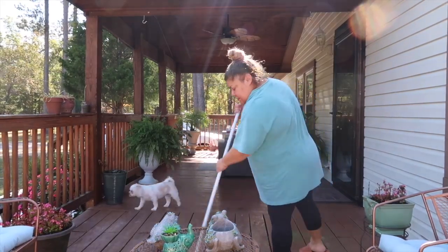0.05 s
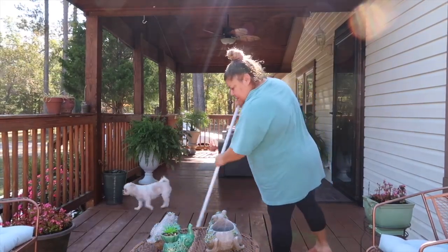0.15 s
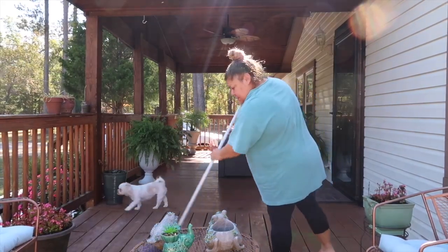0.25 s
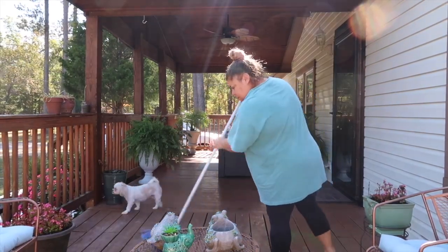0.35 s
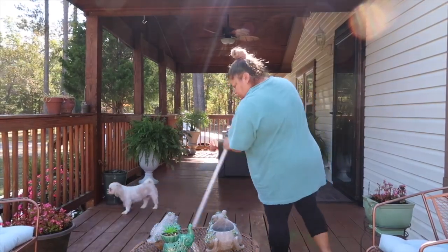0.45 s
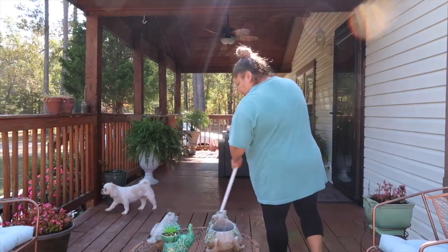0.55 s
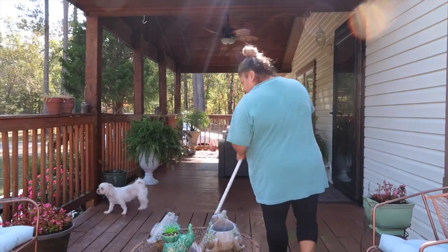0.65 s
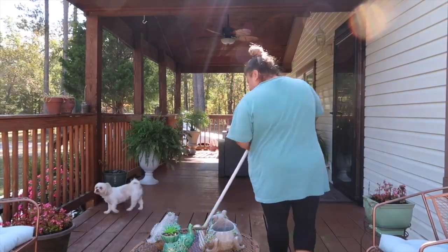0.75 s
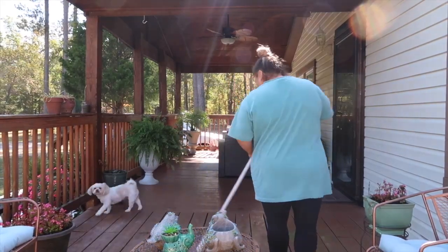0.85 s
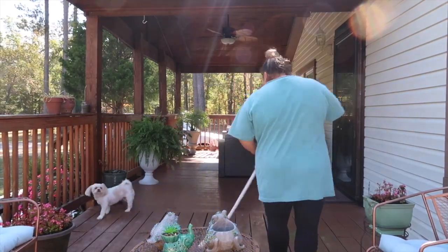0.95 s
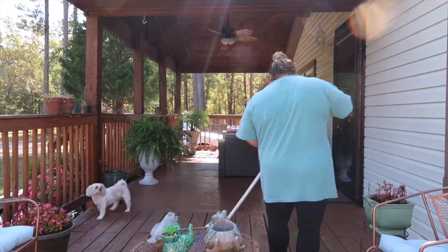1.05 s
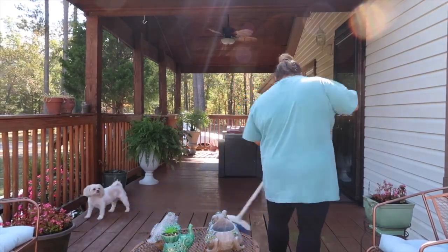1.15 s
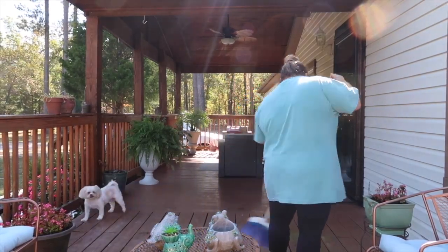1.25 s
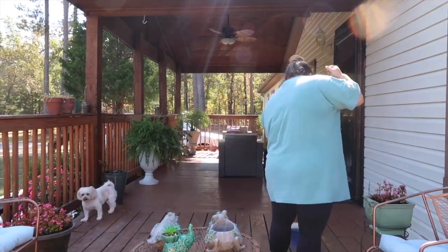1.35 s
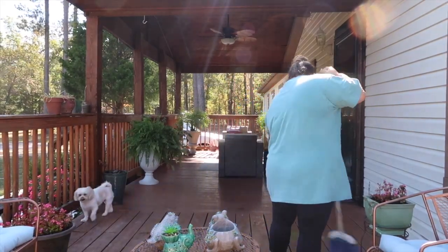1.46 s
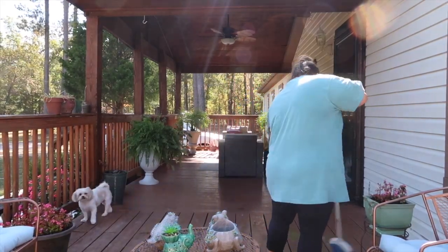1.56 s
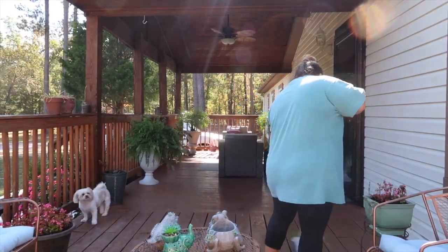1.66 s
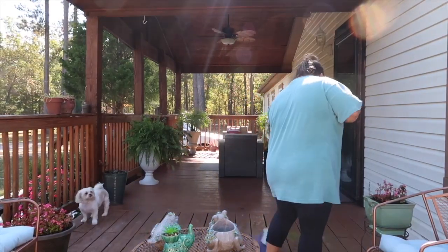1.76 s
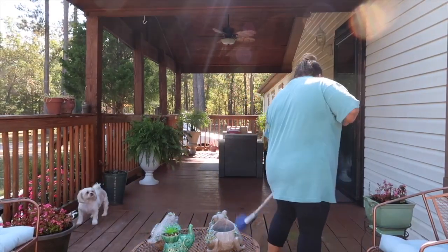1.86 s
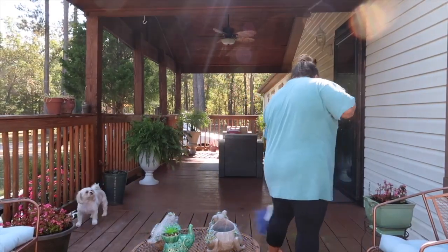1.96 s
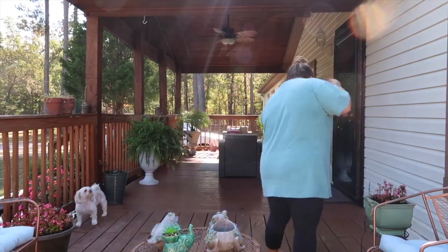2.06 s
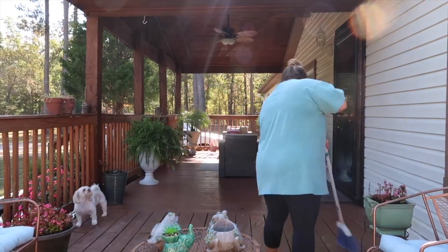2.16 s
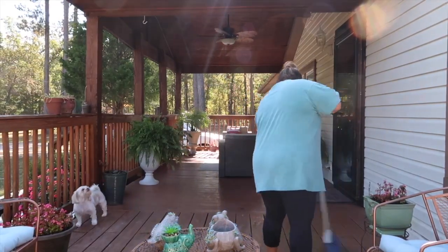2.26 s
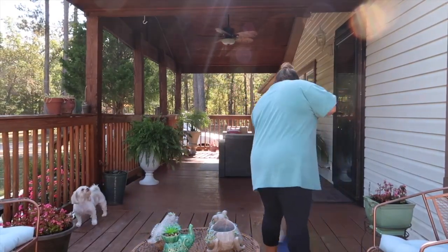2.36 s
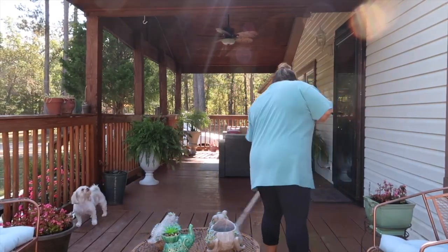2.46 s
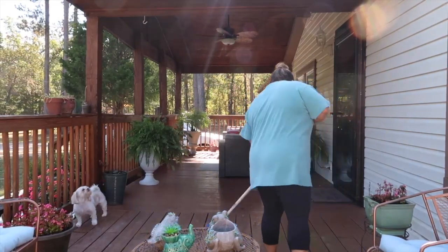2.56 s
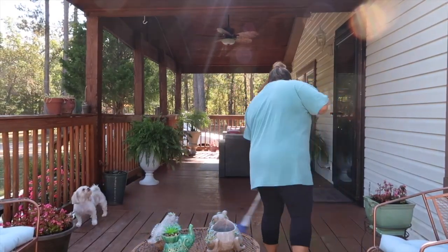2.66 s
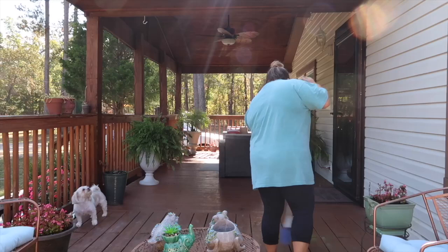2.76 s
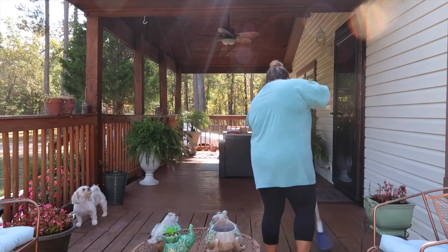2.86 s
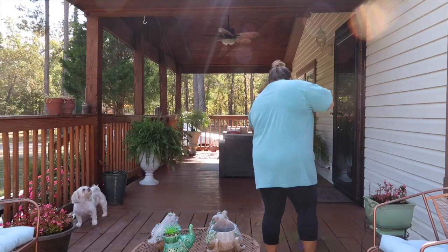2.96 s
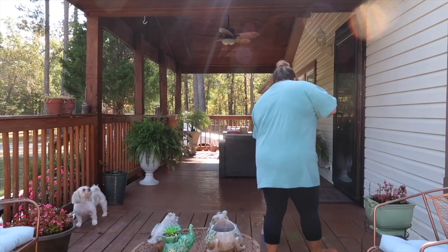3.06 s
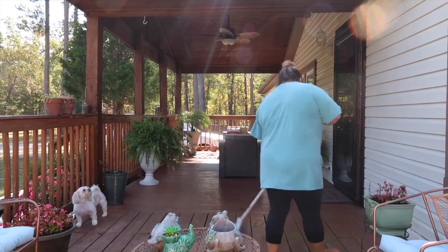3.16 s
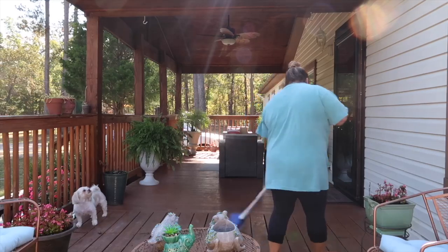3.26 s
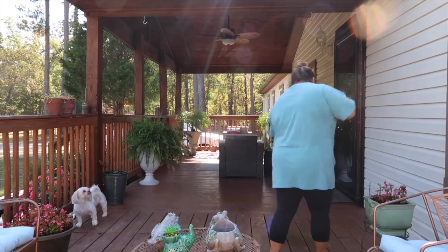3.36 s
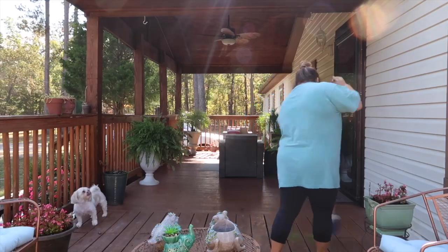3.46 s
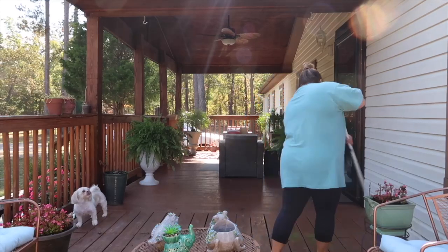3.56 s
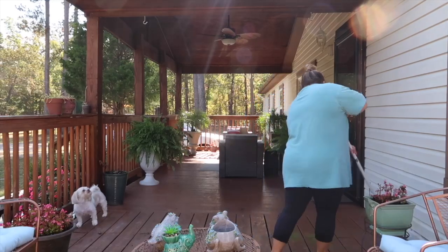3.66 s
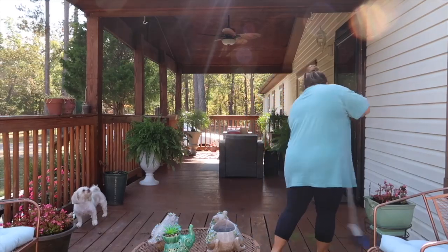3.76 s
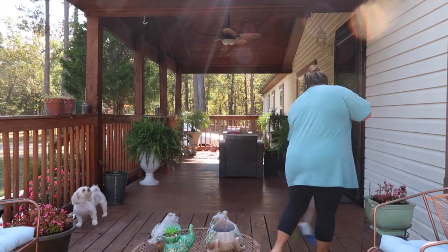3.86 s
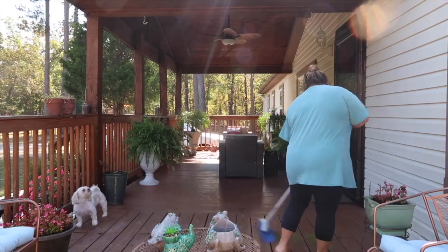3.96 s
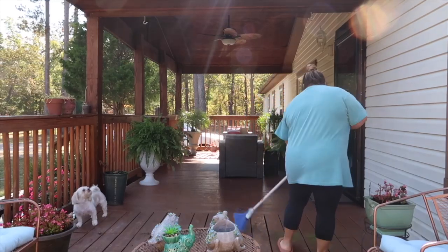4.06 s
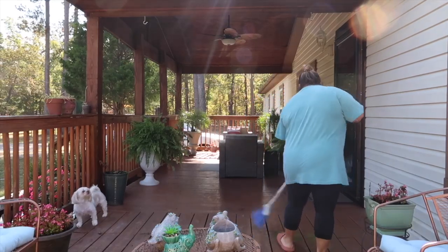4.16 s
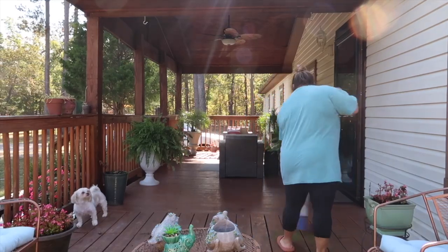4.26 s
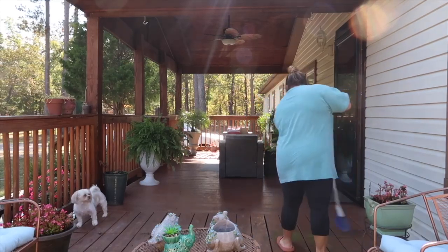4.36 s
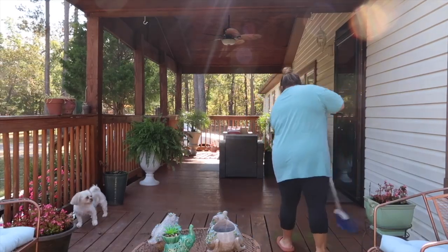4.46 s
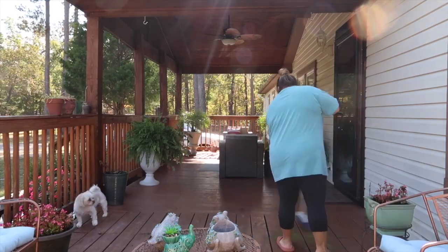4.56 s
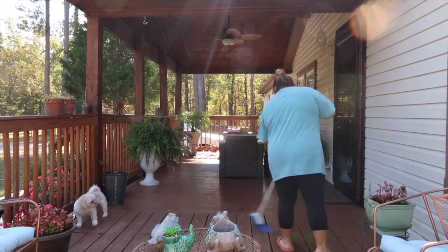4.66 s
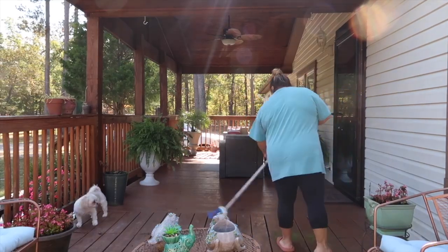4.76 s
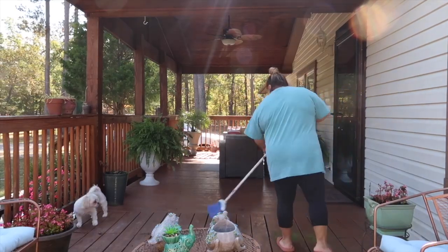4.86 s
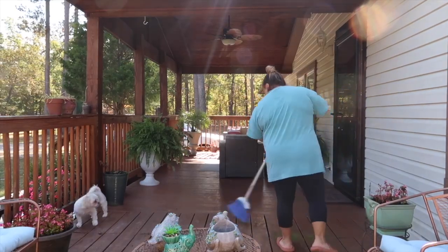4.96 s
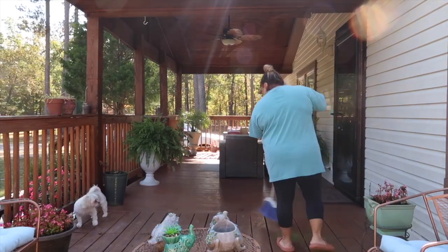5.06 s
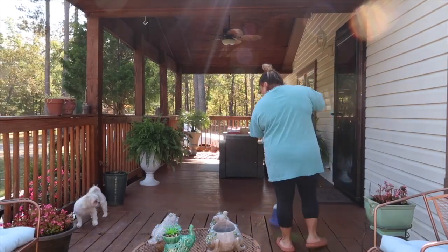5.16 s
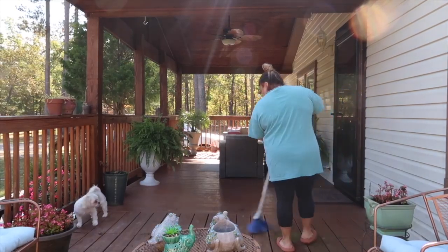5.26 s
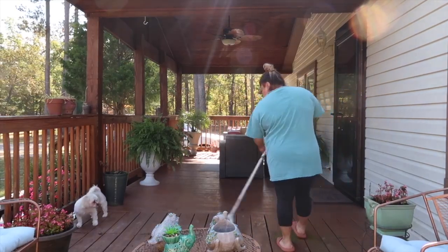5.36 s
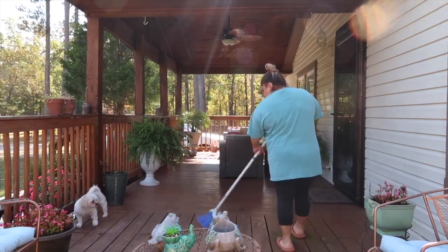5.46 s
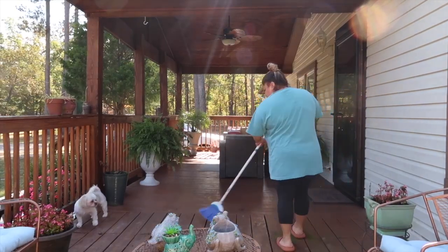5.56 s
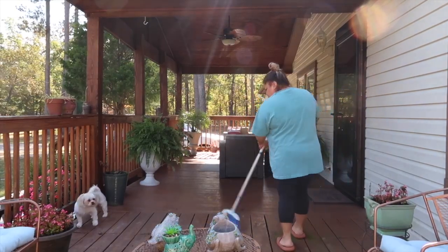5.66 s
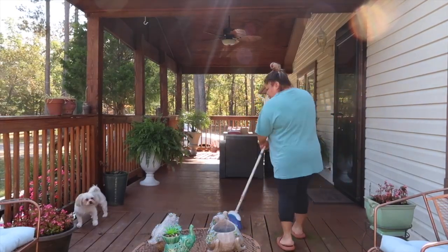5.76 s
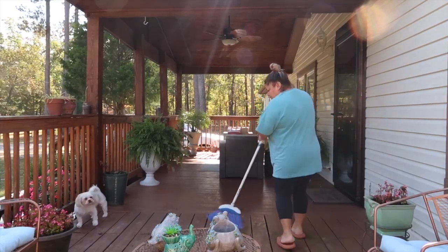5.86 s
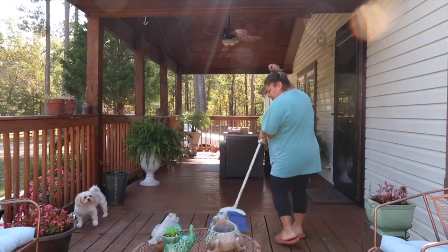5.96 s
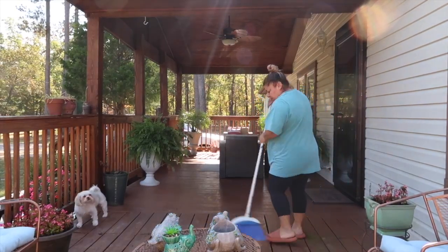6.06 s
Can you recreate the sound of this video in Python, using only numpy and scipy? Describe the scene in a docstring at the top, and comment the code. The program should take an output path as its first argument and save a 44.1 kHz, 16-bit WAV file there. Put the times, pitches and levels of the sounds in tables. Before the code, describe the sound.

A stiff plastic broom sweeps a wooden porch deck in steady swishing strokes, with one loud hard knock early on and small ticks and scratches.

```python
"""A broom on a wooden deck

A plastic broom sweeps a wooden deck under a porch roof, heard a few metres away through two close ports.
Bristles flicking over the grain are random clicks and noise shaped by spectra and board resonances.
The head lands with taps and one hard knock, made of ringing modes, noise splashes and a deck thud.
The handle ticks and creaks in its socket, tufts scratch as they snag, and soft thumps bend the boards.
Roof and wall give a short echo of fading noise, over a quiet outdoor background of shaped noise.
"""
import sys
import numpy as np
from scipy import signal
from scipy.fft import rfft, irfft, next_fast_len
from scipy.io import wavfile
from scipy.ndimage import map_coordinates

SR = 44100
rng = np.random.default_rng(int(sys.argv[2]) if len(sys.argv) > 2 else 0)


def wrap_up_sound(samples):
    """Save the sound to the file named by the first command line argument, as 16-bit audio."""
    columns = np.atleast_2d(samples).T
    # keep every value between -1 and 1, then stretch to whole-number steps
    tamed = np.clip(columns, -1, 1)
    steps = np.round(tamed * 32767).astype(np.int16)
    wavfile.write(sys.argv[1], SR, steps)


N = 268811  # length of the scene in samples

# Broom strokes; start_s is when full speed is reached, levels are before the trims in sweeping():
# start_s, hold_s, rise_s, fall_s, bristle_db, rasp_db, tip_hiss_db, rumble_db, tip_lag_s
STROKES = [ (0.223, 0.055, 0.19, 0.2, -33.5, -45.5, -50, -67, 0.048),
           (0.621, 0.019, 0.073, 0.078, -41, -45.5, -48, -42, 0.031),
           (0.769, 0.017, 0.11, 0.43, -45, -50, -82, -70, 0.026),
           (0.946, 0.007, 0.026, 0.045, -71, -45, -56, -62, 0.019),
           (1.222, 0.021, 0.16, 0.29, -48, -54.5, -59, -58, -0.018),
           (1.464, 0.029, 0.74, 0.087, -52, -70, -71, -69, -0.0051),
           (1.74, 0.099, 0.37, 0.13, -40.5, -44, -55, -40, 0.011),
           (2.084, 0.065, 0.19, 0.3, -49.5, -56, -87, -74, 0.045),
           (2.434, 0.11, 0.24, 0.21, -41, -38.5, -49, -41, 0.025),
           (3.096, 0.16, 0.16, 0.22, -42, -41.5, -52.5, -43.5, 0.000089),
           (3.416, 0.033, 0.25, 0.2, -55.5, -78, -61.5, -69, 0.0082),
           (3.858, 0.26, 0.16, 0.14, -42, -41.5, -53, -42, -0.00031),
           (3.945, 0.041, 0.077, 0.096, -53.5, -35, -68, -25, 0),
           (4.684, 0.16, 0.21, 0.18, -40.5, -39, -50.5, -38, -0.0045),
           (5.37, 0.049, 0.14, 0.23, -37.5, -34.5, -50, -38, 0.036),
           (5.962, 0.018, 0.075, 0.14, -63.5, -57, -94, -47, 0)]
# Light brushing between strokes, same trims: bristle_db, rasp_db, tip_hiss_db, rumble_db
TRAIL_DB = (-70, -63.5, -68.5, -56)
SWING_DB = 24.5  # a stroke gains this much over its rise and loses it over its fall
SWING_CURVE = 1.274  # power that bends the level over at the top and makes it drop ever faster

# Board resonances under the rubbing bristles, before they drift: pitch_hz, width_hz, level_db
RASP = [(419, 87, 0.5), (589, 33, 6), (705, 90, 5.5), (910, 250, 4), (995, 185, 8), (1210, 113, -4),
        (1417, 49, 2.5)]
# Deep shaking of the boards: pitch_hz, width_hz, level_db
RUMBLE = [(80, 31, -2.5), (136.6, 21, 1.5), (169, 12, 4), (226, 55, -6), (289, 9.3, -4.5)]
BOARD_DRIFT = .07  # typical drift of the rasp's pitch from spot to spot, as a share of it
# Spectrum of the bristles: pitch_hz, level_db
BRISTLES = [(200, -7), (700, -9), (1200, -9), (1800, -1), (2300, -1), (2700, -3.5), (3200, -2), (4000, -9),
            (5000, -16), (7000, -16), (12000, -36)]
# Spectrum of the fine tips: pitch_hz, level_db
TIPS = [(2500, -25), (4200, -6), (4800, -1), (6800, -1), (8200, -.5), (9300, 0), (11000, 1), (12800, -1),
        (14000, -9), (15500, -20)]
# Spectrum of the tip fizz that differs between the ports: pitch_hz, level_db
SCATTER = [(3000, -1), (4600, 5.5), (7200, -3), (8200, 1), (9300, -47)]

# Stiff tufts snag and scratch free; the rows near 5.73 s are instead sharp cracks of the head landing: start_s,
# level_db, pitch_hz (centre), length_s
SNAGS = [(0.211, -43, 2240, .014), (.24, -35, 2200, .01), (0.525, -54.5, 2240, .012),
         (0.565, -44, 3070, 0.014), (0.6, -43, 1060, .012), (0.632, -55, 990, .012),
         (0.739, -47, 1920, 0.022), (0.959, -52, 3000, .02), (1.832, -47, 2600, .03),
         (2.277, -36, 2490, .008), (2.288, -45, 900, .018), (2.468, -39, 1480, .016),
         (2.51, -42, 1900, .01), (2.551, -40.5, 2020, .026), (2.57, -39.5, 4030, .008),
         (2.971, -44.5, 1660, .018), (3.148, -52, 2200, .016), (3.197, -48, 2390, .014),
         (3.216, -43, 2100, .018), (3.758, -44, 1650, .016), (3.86, -39.5, 2150, .018),
         (3.907, -36, 890, .014), (4.147, -40.5, 2100, .008), (4.626, -57, 1900, .014),
         (4.674, -44, 2000, .016), (4.784, -47, 1300, .014), (4.899, -51, 2380, .026),
         (4.969, -52.5, 2440, 0.011), (5.112, -53.5, 2610, .008), (5.258, -51, 2400, 0.015),
         (5.357, -41, 1900, .012), (5.378, -37.5, 1190, .016), (5.73, -30, 3370, 0.0032),
         (5.738, -31, 1300, .004), (5.745, -37, 3000, .004), (5.962, -55, 2700, .024)]
# Lesser snags: how many a second, level against the rasp level and its spread (dB)
SNAG_PER_S, SNAG_DB, SNAG_SPREAD_DB = 45, -2.5, 2.2
SNAG_LOW_HZ, SNAG_HIGH_HZ = 850, 4200
SNAG_SHORT_S, SNAG_LONG_S = .003, .012

# The head meets wood, ring level before dulling and splash level before fading:
# start_s, ring_db, thud_db, splash_db, pitch_factor (no unit), cushion_s (softening by the bristles)
BLOWS = [(0.568, -27, -61, -38.5, 1.5, 0.0011), (.587, -19, -52, -54, 0.91, 0.0013),
         (0.932, -19, -64, -52, 2.3, 0.00092), (1.5642, 10.5, -13, -20.5, 1.0, .0004),
         (1.572, -12, -48, -28, 1.1, .001), (1.5879, -7, -29, -41, 1.4, 0.00047),
         (1.5935, -10, -27, -36, 1.4, 0.0018), (1.613, -11, -35, -48, 1.6, .001),
         (2.279, -6.5, -36, -40, 1.2, 0.0028), (2.975, -9, -41.5, -42.5, 1.08, 0.0071),
         (3.147, -16.5, -40.5, -38, 1.2, .002), (3.2, -16, -52, -38, 0.93, 0.0025),
         (3.758, -12, -39.5, -48, 0.94, 0.011), (3.896, -10.5, -45, -34.5, 0.62, 0.0058),
         (4.049, -13, -36, -41, 0.96, 0.0012), (4.607, -18.5, -55, -51, 0.7, 0.0023),
         (5.11, -34, -63, -50, 0.87, .001), (5.255, -4.5, -42, -30, 1.18, 0.0073),
         (5.7265, -8.5, -40, -30, 0.91, 0.0045), (5.737, -16, -41, -38, 1.17, 0.0008),
         (5.7504, -16, -62, -32, 2.4, 0.00054), (5.883, -17.5, -71, -41, 1.06, 0.0031)]
# Ringing of the head at pitch factor 1: pitch_hz, level_db, t60_s (time to fade by 60 dB)
HEAD = [(490, -5.5, 0.039), (683, -10, 0.18), (837, -3.5, 0.11), (939, 10, 0.033), (1020, -21, 0.51),
        (1175, -8, 0.097), (1316, -14, 0.23), (1373, -4.5, 0.049), (1482, 10, 0.02), (1620, -2.5, 0.056),
        (1810, -15.5, 0.18), (1970, -1.5, 0.032), (2176, 11, 0.01), (2440, -10, 0.056), (2820, -17, 0.14),
        (3390, -4, 0.022), (3750, -12, 0.019), (4590, 2.5, 0.0067)]
# Ringing of the deck: pitch_hz, level_db, t60_s
DECK = [(116.8, 6, 0.15), (147.9, 3, 0.29), (166, -10, 0.18), (212, -5.5, 0.17), (251, 3, 0.11),
        (286.4, -2.5, 0.19), (314, -2.5, 0.18), (396.2, -10, 0.28), (466, -15, 0.26), (569, -19, 0.51),
        (659, -17.5, 0.3)]
# Spectrum of the bristle splash: pitch_hz, level_db
SPLASH = [(40, -42), (130, 5.5), (300, -1.5), (600, 3), (1000, -4.5), (1700, -3.5), (3000, 2.5), (3700, -5),
          (4200, -10), (4800, -9.5), (6000, -16.5), (8000, -13.5), (13000, -30), (15000, -61)]
CONTACT_HZ, CONTACT_SLOPE = 6500, 0.51  # cut-off at 1 ms of cushioning; softer blows are duller by this power

# Dry ticks of the handle, level before dulling: start_s, level_db (peak)
TICKS = [(0.077, -30.5), (1.215, -20), (1.2867, -26), (2.483, -32), (2.53, -25), (2.549, -24),
         (4.3486, -20), (4.364, -29), (4.3728, -26.5), (4.381, -31), (4.424, -27), (4.4836, -25),
         (4.491, -23), (5.582, -19.5), (5.6, -28), (5.6397, -28), (5.661, -27), (5.7752, -24.5),
         (5.7932, -28), (6.0787, -25.5)]
# Ringing of the handle socket before each tick's own shift: pitch_hz, level_db, t60_s
SOCKET = [(1384, 4.5, 0.012), (1540, 4, 0.0073), (1770, -2, 0.011), (2270, 7, 0.006), (2650, -13, 0.0047),
          (5600, -4.5, 0.0062)]
TICK_SPREAD = .05  # no two ticks ring quite alike: typical share of the pitch

# Short creaking scuffs, level before the swell: start_s, level_db, pitch_hz, slip_s
CREAKS = [(.491, -50.5, 890, 0.012), (.93, -33, 1860, 0.0068), (1.861, -35, 760, 0.013),
          (2.825, -44, 770, 0.012), (2.985, -38, 580, 0.013), (3.311, -40.5, 630, 0.008),
          (4.131, -37, 870, 0.009), (4.152, -33.5, 840, 0.0059), (4.526, -37.5, 1064, 0.013),
          (4.901, -40, 900, 0.0054), (4.92, -38.5, 780, 0.0077), (5.109, -42.5, 720, .01),
          (5.342, -36, 730, 0.012), (5.883, -36, 765, 0.0067)]
# Soft thumps of feet or broom on the boards, level before swell and fade: start_s, level_db, pitch_hz
STEPS = [(2.278, -38, 79), (2.393, -38.5, 170), (2.565, -36.5, 169), (3.923, -46, 100), (3.949, -25.5, 185),
         (4.091, -40, 62.6), (4.6, -29.5, 87), (5.325, -39.5, 90), (5.46, -38.5, 165), (5.737, -37.5, 83),
         (5.7432, -26, 165)]

# How far the left port trails the right: pitch_hz, lag_degrees
PORT_LAG = [(3000, 0), (4000, 28), (5000, 97), (7000, 106), (8200, 145), (9400, 174), (11000, 178)]
# Spectrum of the outdoor background: pitch_hz, level_db
OUTDOORS = [(20, -22), (35, -7), (55, 1), (90, -1), (150, -4), (250, -6), (420, -10), (600, -16),
            (1000, -21.3), (2000, -24), (3200, -25.2), (5000, -33), (8000, -32.7), (9000, -34.5),
            (12500, -36), (15000, -50)]
# Its left-right difference against the part both ports share: pitch_hz, level_db
OUTDOORS_SIDE = [(30, -22), (60, -34), (120, -4), (200, -1), (320, 3.5), (1000, 4), (3000, -3),
                 (5000, -7.5)]
OUTDOORS_DB = -47  # middle of its slowly wandering level
TOP_HZ = 15300  # upper limit of the sound


def sweeping():
    """Tufts catch and slip on the grain and shake the boards; returns the sound and each port's fizz."""
    level_db, rasp_db, rumble_db = effort(0), effort(1), effort(3)
    hiss_db = effort(2, tips=True)
    rate = 8000 * undb(.4 * (level_db + 42.0))  # harder strokes free more bristles each second

    # whole tufts snag every few hundredths of a second: the rumble feels this most
    snag = walk(rate=76)
    bristle_clicks = colour(flicks(rate, scatter_db=2.0), BRISTLES)
    bristles = undb(level_db + 0.37 * snag) * unit(bristle_clicks)

    board_clicks = resonate(flicks(rate / 4, scatter_db=2.5), RASP)
    rasp = undb(rasp_db + 0.38 * snag - 3.5) * unit(wander(board_clicks))

    shaking = resonate(rng.standard_normal(N), RUMBLE)
    rumble = undb(rumble_db + 3.4 * snag - 5.5) * unit(shaking)

    hiss = undb(hiss_db + 2.0 * snag)
    tip_clicks = colour(flicks(3 * rate, scatter_db=12.5), TIPS)
    tips = undb(1.5) * hiss * unit(tip_clicks)

    # tips all along the wide head reach each port by different paths
    port_noise = [unit(colour(rng.standard_normal(N), SCATTER)) for _ in range(2)]
    fizz = undb(3.0) * hiss * np.array(port_noise)
    return bristles + rasp + tips + rumble, fizz


def effort(column, tips=False):
    """Level in dB of one part of the sweeping: strokes rise, hold and fall; flexing tips may lead or trail."""
    t = np.arange(N) / SR
    power = undb(TRAIL_DB[column]) ** 2
    for s, hold, rise, fall, *levels_db, lag in STROKES:
        since = t - s - lag * tips
        before = np.maximum(-since / rise, 0)
        after = np.maximum((since - hold) / fall, 0)
        stroke_db = levels_db[column] - SWING_DB * (before + after) ** SWING_CURVE
        power = power + undb(stroke_db) ** 2
    return 10 * np.log10(power)


def flicks(rate, scatter_db):
    """Bristles snapping free, rate a second, each a click of its own strength; rms 1."""
    snaps = (rng.random(N) < rate / SR) * rng.choice([-1, 1], N)
    strength = undb(scatter_db * rng.standard_normal(N))
    return unit(snaps * strength / np.sqrt(rate))


def wander(x):
    """Stretch and squeeze time so that resonances drift as the broom moves from board to board."""
    position = np.cumsum(1 + BOARD_DRIFT * walk(rate=9))
    return map_coordinates(x, [position], order=3, mode="mirror")


def snags():
    """Tufts catch on gaps and splinters: listed scratches (with a few sharp landing cracks near 5.73 s), and
    many lesser ones that follow the rasp level."""
    out, level_db = np.zeros(N), effort(1)
    count = int(SNAG_PER_S * N / SR)
    for when, pitch, length, strength in zip(*rng.random((3, count)), rng.standard_normal(count)):
        hz = SNAG_LOW_HZ * (SNAG_HIGH_HZ / SNAG_LOW_HZ) ** pitch
        length_s = SNAG_SHORT_S + length * (SNAG_LONG_S - SNAG_SHORT_S)
        db = level_db[int(when * N)] + SNAG_DB + SNAG_SPREAD_DB * strength
        add(out, when * N / SR, undb(db) * scratch(hz, length_s))
    for s, db, hz, length_s in SNAGS:
        add(out, s, undb(db) * scratch(hz, length_s))
    return out


def scratch(hz, length_s, clicks_per_s=2200, width=0.5):
    """A tuft lets go bristle by bristle: clicks in one broad resonance, with the energy of rms 1 over its length."""
    size = int(length_s * SR) + 1
    count = int(length_s * clicks_per_s) + 2
    places = rng.integers(0, size, count)
    clicks = np.bincount(places, rng.standard_normal(count), size + SR // 100)  # 10 ms to ring out
    band = [(hz, width * hz, 0)]
    y = resonate(resonate(clicks, band), band)
    return y * np.sqrt(size / np.sum(y ** 2))


def blows(bloom_s=0.0075, deck_cycles=4.9, splash_t60=0.27, treble_t60=0.14,
          rattle_db=-18, rattle_t60=0.07, rattle_per_s=350):
    """The hollow head rings and rattles, bristles splash unevenly, and a thud builds up, lowest notes last."""
    out, t = np.zeros(N), np.arange(SR // 2) / SR
    deck_signs = (-1) ** np.arange(len(DECK))[:, None]
    deck = ring(DECK, t, deck_signs, deck_cycles)
    for s, db, thud_db, splash_db, pitch, cushion_s in BLOWS:
        contact_hz = CONTACT_HZ * (.001 / cushion_s) ** CONTACT_SLOPE
        head = lowpass(ring(HEAD, t * pitch), contact_hz)  # a higher pitch also fades sooner

        # the rattle repeats the ring at random moments
        spread = 1 - np.exp(-(t / bloom_s) ** 2)
        hits = (rng.random(len(t)) < rattle_per_s / SR) * rng.standard_normal(len(t))
        chatter = hits * spread * fade(t, rattle_t60)
        head = head + undb(rattle_db) * signal.fftconvolve(head, chatter)[:len(t)]

        clumps = undb(2.5 * flutter(len(t), 140))
        noise = unit(colour(clumps * rng.standard_normal(len(t)), SPLASH))
        dull = lowpass(noise, 1800)
        splash = dull * fade(t, splash_t60) + (noise - dull) * fade(t, treble_t60)

        landing = 1 - np.exp(-t / cushion_s)
        broom_head = landing * (undb(db) * head + undb(splash_db) * splash)
        add(out, s, broom_head + undb(thud_db) * deck)
    return out


def ticks(scuff_db=-22, scuff_t60=0.15, contact_hz=5500):
    """The handle shifts in its socket with a very short ring and a trace of scraping."""
    out, t = np.zeros(N), np.arange(SR // 20) / SR
    for s, db in TICKS:
        pitch = 1 + TICK_SPREAD * rng.standard_normal()
        tick = lowpass(ring(SOCKET, t * pitch), contact_hz)
        smeared = signal.fftconvolve(tick, rng.standard_normal(len(t)))[:len(t)]
        scuff = unit(smeared) * fade(t, scuff_t60)
        add(out, s, undb(db) * (tick + undb(scuff_db) * scuff))
    return out


def creaks(ring_t60=0.036, waver=0.053, width=0.35, tone_db=-5, scrape_db=-12):
    """A brief gritty slip grates and squeaks in one resonance, its pitch wavering, with a faint broader scrape."""
    out, t = np.zeros(N), np.arange(SR // 8) / SR
    for s, db, hz, slip_s in CREAKS:
        rise = np.minimum(3 * t / slip_s, 1)  # full after a third of the slip
        swell = rise * fade(np.maximum(t - slip_s, 0), ring_t60)
        pitch_hz = hz * (1 + waver * flutter(len(t), 130))
        tone = np.sin(2 * np.pi * np.cumsum(pitch_hz) / SR)
        band = [(hz, width * hz, 0)]
        scrape = unit(resonate(rng.standard_normal(len(t)), band))
        grit = unit(resonate(scrape, band))
        grip = undb(2.2 * flutter(len(t), 200))
        creak = unit(grip * (grit + undb(scrape_db) * scrape + undb(tone_db) * tone))
        add(out, s, undb(db) * swell * creak)
    return out


def thumps(t60=0.13):
    """A heel or the broom bends a board, which swings back and forth as a fading low tone."""
    out, t = np.zeros(N), np.arange(SR // 5) / SR
    swell = 2 * (1 - np.exp(-t / 0.0035))
    for s, db, hz in STEPS:
        add(out, s, undb(db) * np.sin(2 * np.pi * hz * t) * fade(t, t60) * swell)
    return out


def porch(x, echo_db=-13.5, low_t60=0.36, high_t60=0.28, delay_s=0.0022, side_db=-6):
    """Roof, wall and rails scatter a short echo, part of it from the sides; its treble fades sooner."""
    t = np.arange(SR // 2) / SR
    build_up = 1 - np.exp(-(t / delay_s) ** 2)
    echoes = []
    for noise in rng.standard_normal((2, len(t))):
        dull = lowpass(noise, 800)
        tail = (dull * fade(t, low_t60) + (noise - dull) * fade(t, high_t60)) * build_up
        echoes.append(signal.fftconvolve(x, tail / np.linalg.norm(tail))[:N])
    front, side = echoes
    return undb(echo_db) * (ports(front) + undb(side_db) * np.array([side, -side]))


def outdoors():
    """A low distant rumble, alike at both ports, under a faint wide hiss; the level wanders."""
    front, side = (unit(colour(rng.standard_normal(N), OUTDOORS)) for _ in range(2))
    side = colour(side, OUTDOORS_SIDE)
    level = undb(OUTDOORS_DB + 1.64 * walk(rate=5.9))
    return level * (ports(front) + np.array([side, -side]))


def ports(x):
    """Long waves reach both ports alike; the shortest arrive in nearly opposite phase."""
    hz = np.fft.rfftfreq(N, 1 / SR)
    lag = np.radians(np.interp(hz, *np.transpose(PORT_LAG)))
    turn = np.exp(.5j * lag)  # half the lag for each port
    return irfft(rfft(x) * np.array([1 / turn, turn]), N)


def undb(db):
    """Decibels to gain."""
    return 10 ** (np.asarray(db) / 20)


def unit(x):
    """Scale to rms 1."""
    return x / np.sqrt(np.mean(x ** 2))


def gains(points, size=N):
    """Turn a spectrum of (Hz, dB) points into gains on the FFT bins."""
    hz, db = np.transpose(points)
    bins_hz = np.fft.rfftfreq(size, 1 / SR) + 1  # 1 Hz up, to avoid log of zero
    return undb(np.interp(np.log(bins_hz), np.log(hz), db))


def colour(x, points):
    """Filter a sound by a spectrum of (Hz, dB) points."""
    size = next_fast_len(len(x), True)
    return irfft(rfft(x, size) * gains(points, size), size)[:len(x)]


def lowpass(x, hz):
    """A gentle second-order low-pass."""
    return signal.sosfilt(signal.butter(2, min(hz, SR / 2 - 1000), fs=SR, output="sos"), x)


def resonate(x, bands):
    """Drive (Hz, width Hz, dB) resonances side by side, with alternating signs."""
    out = 0
    for k, (hz, width, db) in enumerate(bands):
        b, a = signal.iirpeak(hz, hz / width, fs=SR)
        out = out + (-1) ** k * undb(db) * signal.lfilter(b, a, x)
    return out


def fade(t, t60):
    """Exponential decay, 60 dB down at t60."""
    return np.exp(-np.log(1000) * t / t60)


def ring(modes, t, signs=1, bloom_cycles=0):
    """The ringing of struck modes, peak 1; each may take some of its cycles to build up."""
    hz, db, t60 = np.transpose(modes)[:, :, None]
    bloom = 1 - np.exp(-(hz * t / bloom_cycles) ** 2) if bloom_cycles else 1
    tones = signs * undb(db) * bloom * fade(t, t60) * np.sin(2 * np.pi * hz * t)
    y = np.sum(tones, axis=0)
    return y / np.abs(y).max()


def add(track, s, sound):
    """Mix a sound into the track at time s, cut off at the track's end."""
    start = max(int(s * SR), 0)
    track[start:start + len(sound)] += sound[:max(N - start, 0)]


def walk(rate):
    """Smooth chance with a spread near 1, drawn anew rate times a second with straight lines between."""
    knots = rng.standard_normal(4096)
    return 1.2 * np.interp(np.arange(N) / SR * rate, np.arange(len(knots)), knots)


def flutter(size, hz):
    """Quick uneven wobble, mostly below hz; rms 1."""
    return unit(lowpass(rng.standard_normal(size), hz))


def scene():
    """The broom works a little to the right, which favours that port, most of all near 4500 Hz."""
    rubbing, fizz = sweeping()
    broom = rubbing + snags() + blows() + ticks() + creaks() + thumps()
    lean = colour(broom, [(200, -40), (550, -34), (4500, -18.5), (8000, -25)])
    direct = ports(broom) + np.array([-lean, lean])
    return direct + fizz + porch(broom) + outdoors()


def record(dry):
    """Clip at full scale, then cut steeply above TOP_HZ."""
    clipped = np.clip(dry, -1, 1)
    return signal.sosfilt(signal.ellip(8, .2, 70, TOP_HZ, fs=SR, output="sos"), clipped)


dry = scene()
out = record(dry)
wrap_up_sound(out)
```